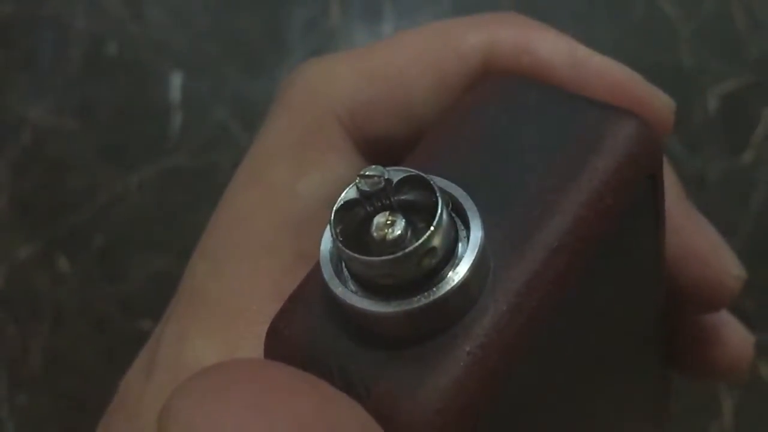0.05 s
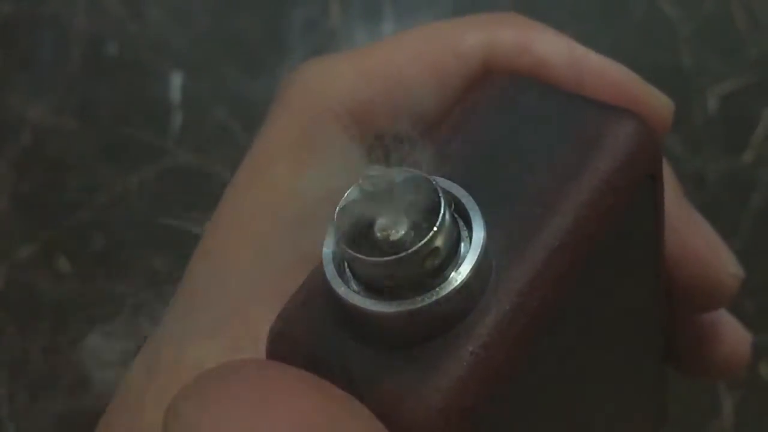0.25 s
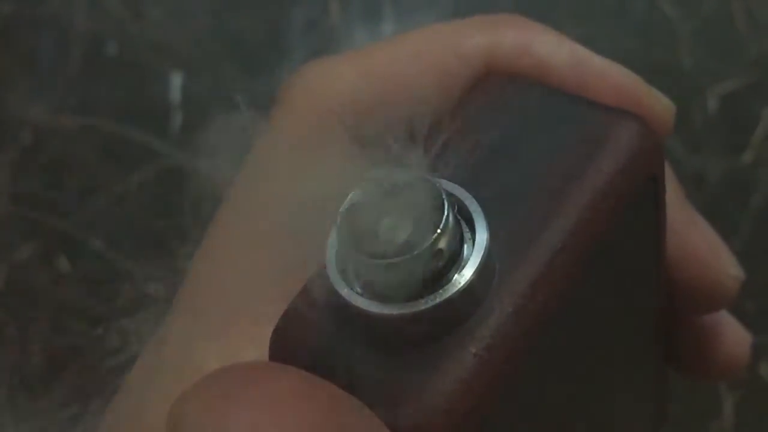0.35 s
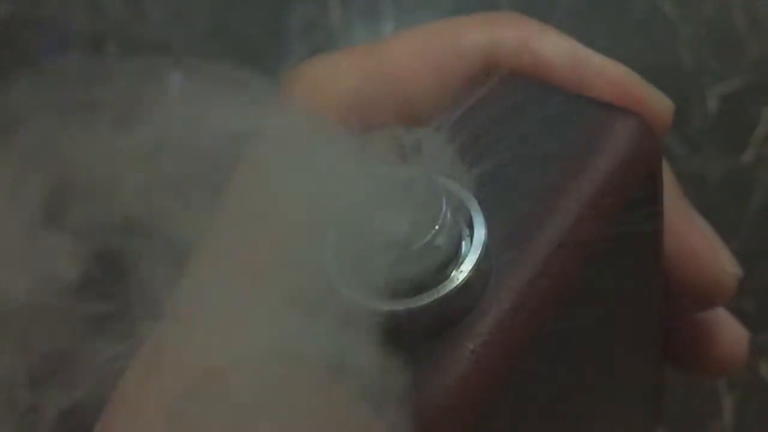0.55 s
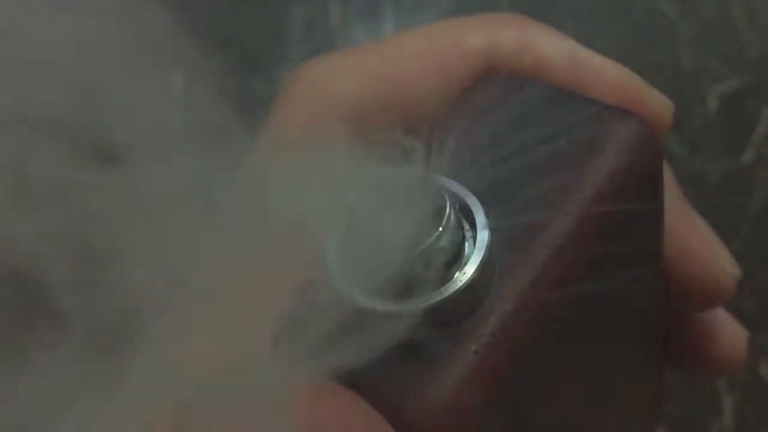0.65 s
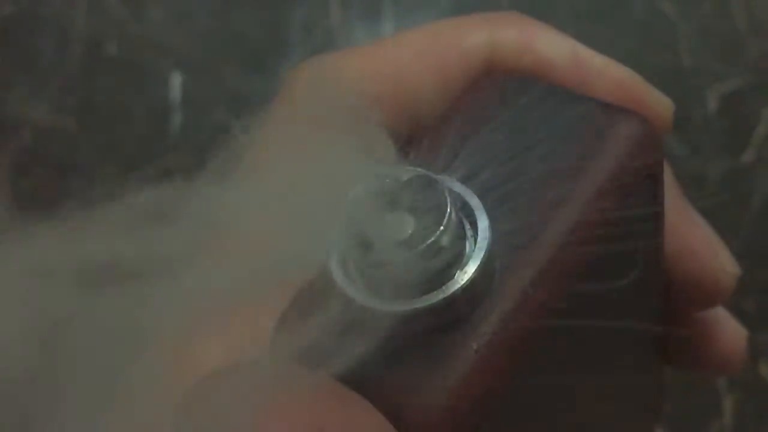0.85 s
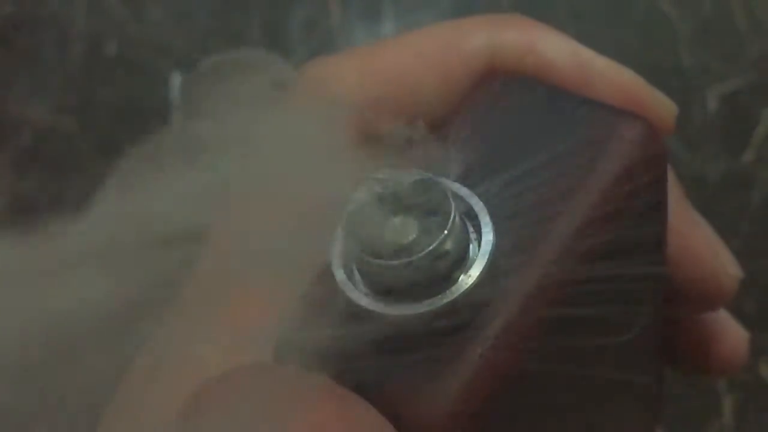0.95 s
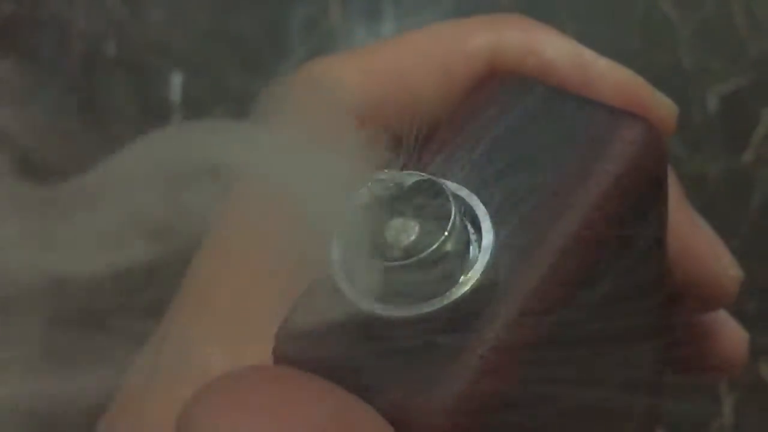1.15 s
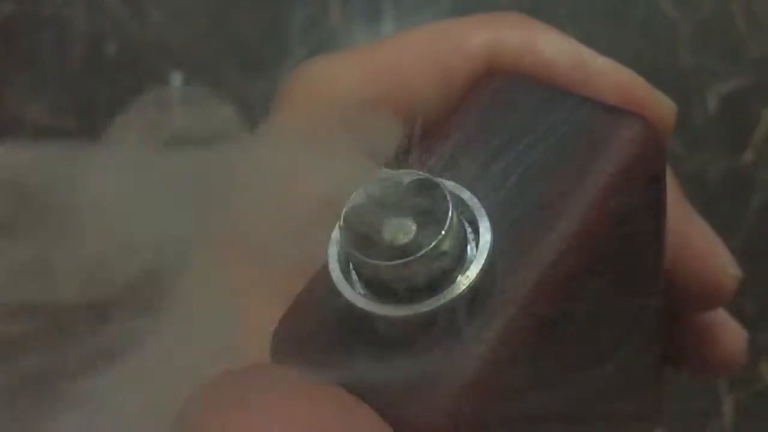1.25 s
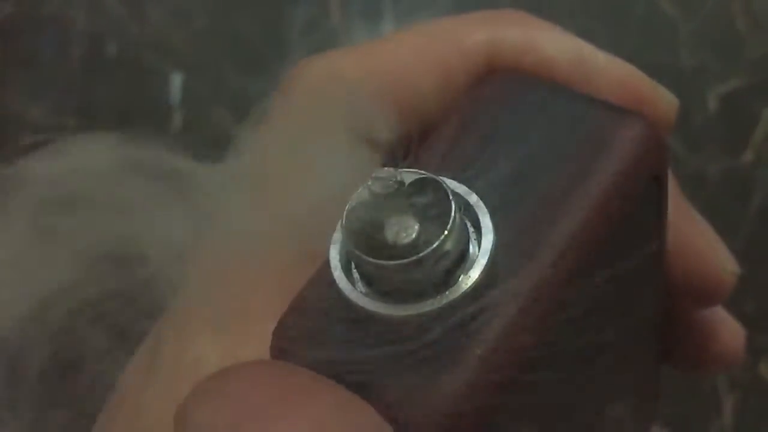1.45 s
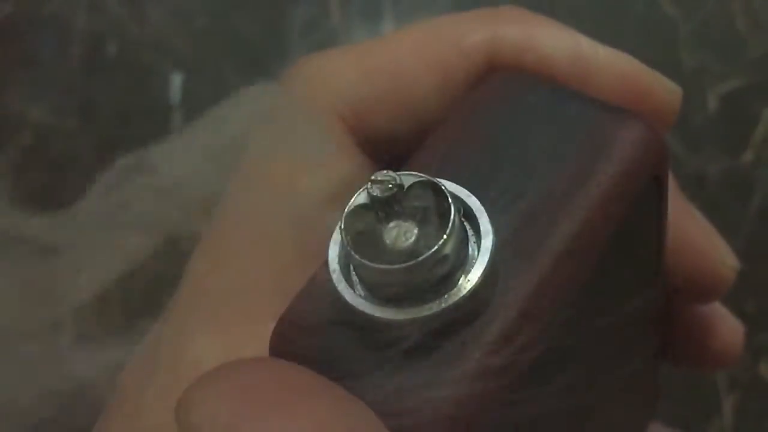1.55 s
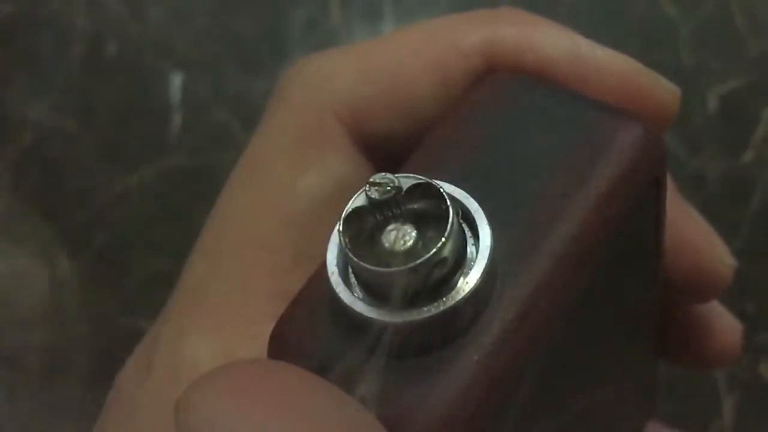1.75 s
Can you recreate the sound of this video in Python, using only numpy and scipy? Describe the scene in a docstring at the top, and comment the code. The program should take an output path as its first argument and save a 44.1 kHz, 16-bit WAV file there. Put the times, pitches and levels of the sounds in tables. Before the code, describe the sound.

Bright, crackling sizzle of liquid boiling on a vaporizer coil, stopping abruptly.

```python
"""In a quiet room with a low, wavering hum, the button of a handheld vaporizer ticks, close by.
The bare coil heats and for about 1.3 s liquid boils on the wire: thousands of tiny bursts merge
with a steam hiss, and a few droplets pop. The sizzle starts bright, then fills out as larger
bubbles join. The power is cut, the boil collapses, and the cooling wire gives some last ticks
and a faint fizz."""
import sys
import numpy as np
from scipy import signal
from scipy.fft import rfft, irfft, next_fast_len
from scipy.io import wavfile
from scipy.ndimage import map_coordinates

SR = 44100
rng = np.random.default_rng(int(sys.argv[2]) if len(sys.argv) > 2 else 0)


def persist_wave(psi):
    """Save psi, clipped to +-1, as 16-bit WAV."""
    counts = np.round(np.clip(psi, -1, 1) * 32767).astype(np.int16)
    wavfile.write(sys.argv[1], SR, np.atleast_2d(counts).T)


N = 79380

FIRE_S, RELEASE_S = 0.19, 1.534  # boiling begins, power is cut
# spectrum of the fine fizz (frequency [Hz], gain [dB])
FIZZ_SPECTRUM = [(100, -28), (1000, -36.5), (3000, -9), (4400, -8), (5200, -6.5), (6700, -2), (8400, -8.5),
                 (10000, -4), (11800, 0.5), (14000, 2.5), (15500, -2.5)]
# spectrum of the larger bubbles (frequency [Hz], gain [dB])
BUBBLE_SPECTRUM = [(60, -33.5), (200, -18), (450, -14), (650, -5.5), (1200, -2), (1900, 0.5), (2500, -.5),
                   (3300, -3.5), (4400, -2.5), (5200, -4.5), (6700, -2.5), (9000, -7.5), (15500, -9.5)]
# resonances and notches of the metal cup around the coil (frequency [Hz], half-width [Hz], gain [dB])
CUP_RESONANCES = [(1305, 22, 3), (1910, 24, 3), (2535, 22, 3.5), (4350, 30, 3.5), (5020, 240, -2.5),
                  (9265, 150, -7.5), (10540, 195, -5.5)]


def sizzle():
    """Boiling in two sizes: fine fizz surges first, larger bubbles follow as the wick warms through."""
    t = np.arange(N) / SR
    age = np.maximum(t - FIRE_S, 0)
    boil_db = boil_vigour_db(t) + 0.46 * wobble(per_s=45)  # the boil is slightly unsteady
    surge_db = 7 * np.exp(-age / 0.14)
    lag_db = -10 * np.exp(-age / 0.065)
    fizz = bursts(boil_db - 38.5 + surge_db, FIZZ_SPECTRUM, per_s=5000)
    bubbles = bursts(boil_db - 42 + lag_db, BUBBLE_SPECTRUM, per_s=2000)
    return fizz + bubbles


def boil_vigour_db(t):
    """Heat drives the boil: its level rises as the wire warms, holds, swells a little and falls."""
    heat_s, swell_from_s = 0.017, 1.15
    cool_db_per_s, simmer_db_per_s = 728, 137
    first_hiss = -10 * np.clip((FIRE_S - t) / 0.0059, 0, 10)  # fades in just ahead of the boil
    heating = -25.5 * np.exp(-np.maximum(t - FIRE_S, 0) / heat_s)
    swell = 0.72 * np.clip((t - swell_from_s) / (RELEASE_S - swell_from_s), 0, 1)
    since_release = np.maximum(t - RELEASE_S, 0)
    collapse = -cool_db_per_s * since_release
    simmer = -27.5 - simmer_db_per_s * since_release
    return first_hiss + heating + swell + np.maximum(collapse, simmer)


def bursts(level_db, spectrum, per_s):
    """Shot noise: random bursts add up over steam hiss; a weaker boil has fewer and smaller ones."""
    thinning, size_spread_db, steam_db = 0.55, 4.5, -3
    level = amp(level_db)
    vigour = level / level.max()
    chance = vigour ** thinning * per_s / SR
    sizes = amp(size_spread_db * np.minimum(rng.standard_normal(N), 2)) * rng.choice([-1, 1], N)
    clicks = (rng.random(N) < chance) * unit(sizes) / np.sqrt(chance)  # same mean power at any rate
    steam = amp(steam_db) * rng.standard_normal(N)
    boil = coloured(vigour * (clicks + steam), spectrum, CUP_RESONANCES)
    return unit(boil) * np.sqrt(np.mean(level ** 2))


def droplet_pops():
    """Impulse excitation: each bursting droplet is a snap with a ragged tail, coloured by the cup."""
    # bursting droplets (time [s], relative peak level [dB], brightness [-1 to 1])
    droplets = [(.192, -38.5, 0.44), (0.1957, -31, 0.24), (.2062, -29, 0.25), (.211, -28, 0.74),
                (0.2285, -21, 0.34), (0.2318, -19, 1), (0.2575, -16.5, 0.62), (0.2684, -21, -0.46),
                (.293, -20, -0.21), (0.3089, -22, .4), (0.3159, -22, 0.43), (.488, -17, 0.095),
                (0.555, -25.5, -0.066), (0.6627, -16, -0.51), (0.721, -22, -0.77), (0.775, -22, -0.49),
                (.8251, -17.5, -0.12), (0.8977, -19, -0.54), (.9578, -19.5, 0.37), (1.004, -24, 0),
                (1.147, -24, -0.33), (1.304, -20.5, -0.61), (1.363, -26, 0.055), (1.3702, -19.5, 0.63),
                (1.3998, -21.5, 0.68), (1.478, -33, 0.46), (1.5343, -21, 0.21), (1.5572, -27.5, -0.13),
                (1.584, -44.5, -0.57), (1.5965, -45, -.5), (1.62, -54, -0.12), (1.629, -56, -0.29)]
    gain_db, tail_db, tail_t60_s = 2.5, -18, 0.0062
    t = np.arange(SR // 20) / SR
    out = np.zeros(N + SR)
    for start_s, db, brightness in droplets:
        snap = amp(tail_db - 60 * t / tail_t60_s) * rng.standard_normal(len(t))
        snap[0] = 1
        bright = coloured(snap, FIZZ_SPECTRUM, CUP_RESONANCES)
        dull = coloured(snap, BUBBLE_SPECTRUM, CUP_RESONANCES)
        share = (1 + brightness) / 2
        pop = band_limit(share * bright + (1 - share) * dull)
        out[round(start_s * SR):][:len(t)] += amp(db + gain_db) * pop / np.abs(pop).max()
    return out[:N]


def last_fizz():
    """Evaporation: a last trace of liquid leaves the cooling wire in a soft puff of noise."""
    start_s, rise_s, peak_db = 1.695, 0.018, -77
    age = np.maximum(np.arange(N) / SR - start_s, 0) / rise_s
    hiss = unit(coloured(rng.standard_normal(N), FIZZ_SPECTRUM, CUP_RESONANCES))
    return amp(peak_db) * age * np.exp(1 - age) * hiss


def button_tick():
    """Free vibration: the pressed button rings briefly in its damped modes."""
    # modes of the button (frequency [Hz], relative level [dB], time to decay by 60 dB [s])
    modes = [(1110, -5, 0.029), (1400, -3, 0.018), (1730, -4, 0.014), (2050, -4, .014), (2720, -12, 0.011)]
    press_s, attack_s, gain_db = 0.1135, 0.0013, -55.5
    t = np.maximum(np.arange(N) / SR - press_s, 0)
    ring = sum(amp(db - 60 * t / t60) * np.sin(2 * np.pi * hz * t) for hz, db, t60 in modes)
    return amp(gain_db) * ring * (1 - np.exp(-t / attack_s))


def reverberation(x, t60_s):
    """Diffuse reflection: the room answers after 4 ms with an exponentially decaying tail."""
    t = np.arange(SR // 2) / SR
    tail = rng.standard_normal(len(t)) * amp(-60 * t / t60_s) * (t > 0.004)
    return signal.fftconvolve(x, tail / np.linalg.norm(tail))[:N]


def hum():
    """Amplitude and phase modulation make a low tone waver."""
    # swells and dips of the hum (time [s], relative level [dB])
    contour = [(0.0, -48.5), (0.06, -66), (0.1, -72), (0.2, -55), (0.224, -67), (0.386, -52.5),
               (0.436, -61), (0.752, -56), (0.802, -70), (0.902, -54.5), (0.932, -63), (1.412, -60.5),
               (1.438, -72), (1.494, -56), (1.588, -56.5), (1.634, -74), (1.694, -56.5), (1.8, -66)]
    hum_hz, gain_db, drift_rad = 73, -1.5, 0.42
    t = np.arange(N) / SR
    level_db = np.interp(t, *np.transpose(contour)) + gain_db + wobble(per_s=10.44)
    phase = 2 * np.pi * hum_hz * t + drift_rad * wobble(per_s=6.58)
    return amp(level_db) * unit(np.sin(phase))


def room_noise():
    """Stationary noise: a low rumble lies under faint broadband air."""
    # spectrum of the room's rumble (frequency [Hz], gain [dB])
    rumble_spectrum = [(20, -39), (40, -27), (55, 0), (68, -4.5), (82, 1), (105, -11.5), (140, -22.5),
                       (400, -52)]
    # spectrum of the room's air (frequency [Hz], gain [dB])
    air_spectrum = [(20, 5), (130, -1), (300, -2), (700, -7), (1300, -8), (2500, -11.5), (7000, -15.5),
                    (10500, -21.5), (13000, -18.5), (15500, -30)]
    rumble = unit(coloured(rng.standard_normal(N), rumble_spectrum))
    air = unit(coloured(rng.standard_normal(N), air_spectrum))
    return amp(-67) * rumble + amp(-72.5) * air


def amp(db):
    """Amplitude ratio of a level in decibels."""
    return 10 ** (np.asarray(db) / 20)


def unit(x):
    """Normalisation to an rms of 1."""
    return x / np.sqrt(np.mean(x ** 2) + 1e-20)


def wobble(per_s):
    """Slow random modulation: a spline through per_s random knots a second."""
    knots = rng.standard_normal(int(N * per_s / SR) + 4)
    return map_coordinates(knots, [np.arange(N) * per_s / SR])


def coloured(x, spectrum, resonances=()):
    """Minimum-phase filter: a broad spectral envelope plus narrow peaks and notches."""
    size = 2 * next_fast_len(len(x))
    hz = np.fft.rfftfreq(size, 1 / SR)
    knot_hz, knot_db = np.transpose(spectrum)
    db = np.interp(np.log(hz + 1), np.log(knot_hz + 1), knot_db)
    for centre, half_width, gain in resonances:
        db += gain / (1 + ((hz - centre) / half_width) ** 2)
    cepstrum = irfft(np.log(amp(db)), size)
    cepstrum[1:size // 2] *= 2  # folding onto positive time makes the filter causal
    cepstrum[size // 2 + 1:] = 0
    return irfft(rfft(x, size) * np.exp(rfft(cepstrum)), size)[:len(x)]


def band_limit(x, top_hz=15440, edge_hz=200):
    """Steep low-pass filter with a raised-cosine edge."""
    length = x.shape[-1]
    size = 2 * next_fast_len(length)
    edge = np.clip((top_hz - np.fft.rfftfreq(size, 1 / SR)) / edge_hz, 0, 1)
    return irfft(rfft(x, size) * np.sin(np.pi / 2 * edge) ** 2, size)[..., :length]


def scene():
    """Superposition: the direct sound of the device, its faint reflections and the background."""
    device = sizzle() + droplet_pops() + last_fizz() + button_tick()
    reflections = amp(-22.5) * reverberation(device, t60_s=0.25)
    return (device + reflections + hum() + room_noise())[None]


def record(dry):
    """Finite bandwidth: the highest treble is cut off."""
    return band_limit(dry)


dry = scene()
out = record(dry)
persist_wave(out)
```